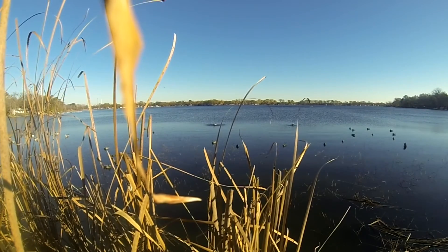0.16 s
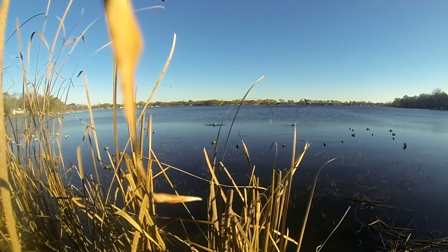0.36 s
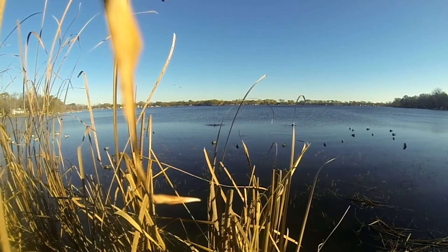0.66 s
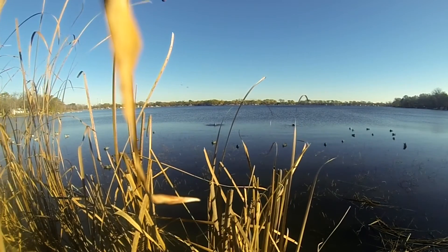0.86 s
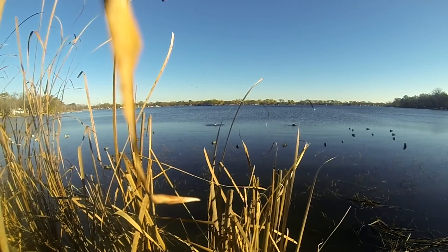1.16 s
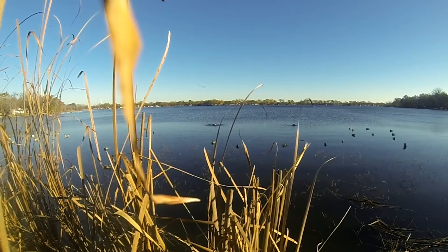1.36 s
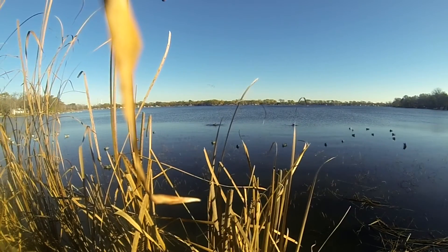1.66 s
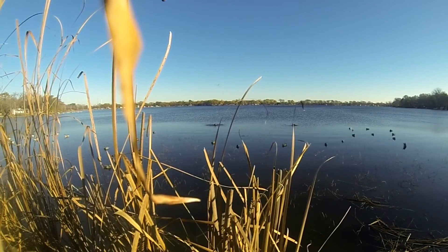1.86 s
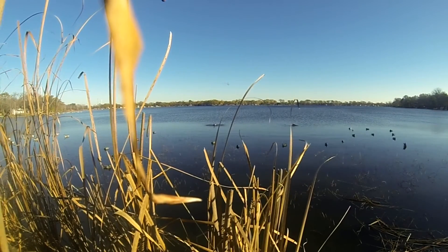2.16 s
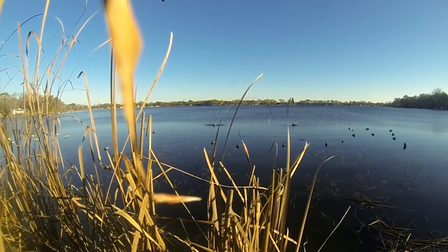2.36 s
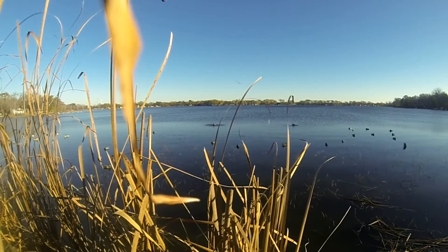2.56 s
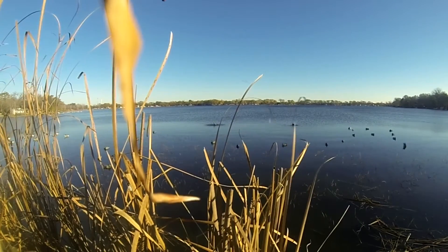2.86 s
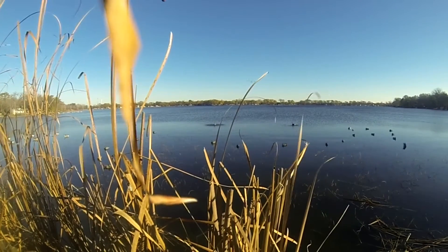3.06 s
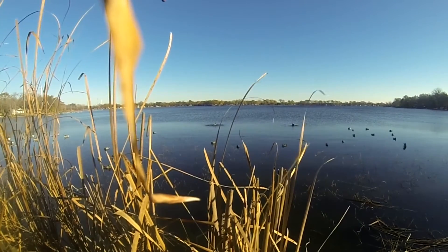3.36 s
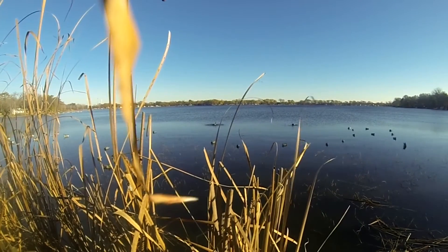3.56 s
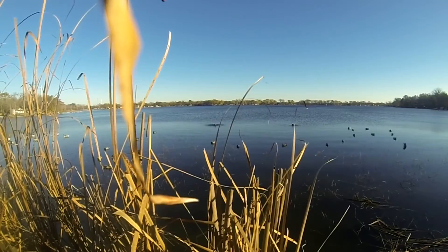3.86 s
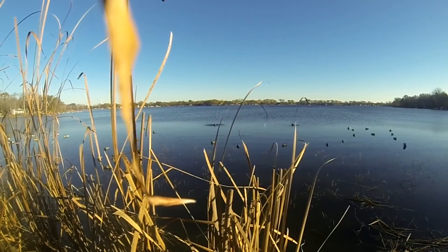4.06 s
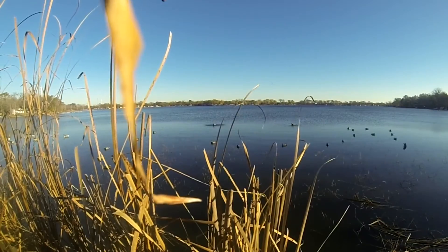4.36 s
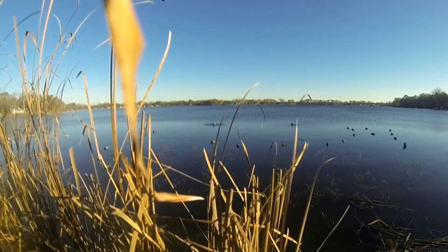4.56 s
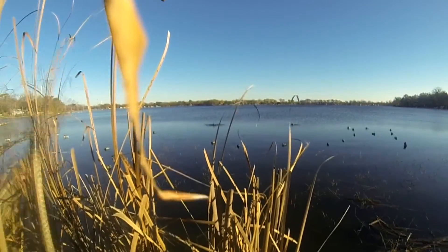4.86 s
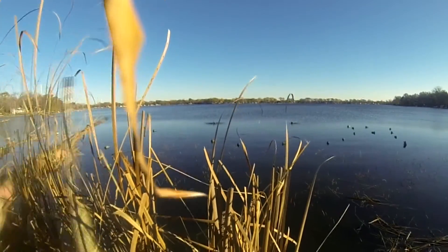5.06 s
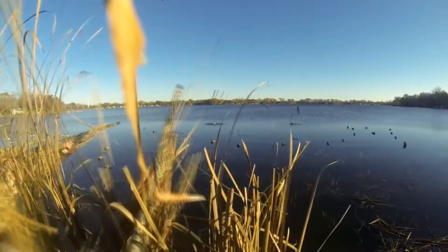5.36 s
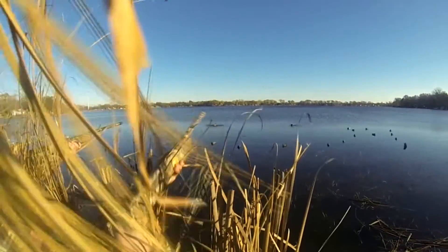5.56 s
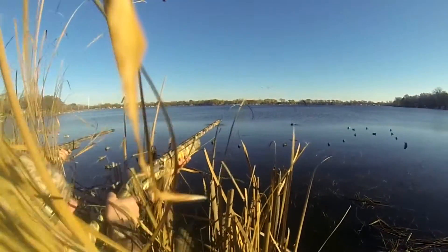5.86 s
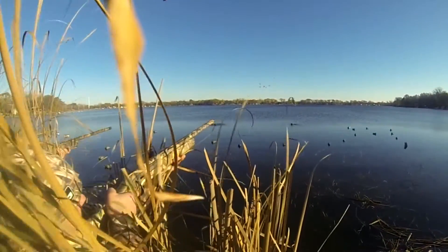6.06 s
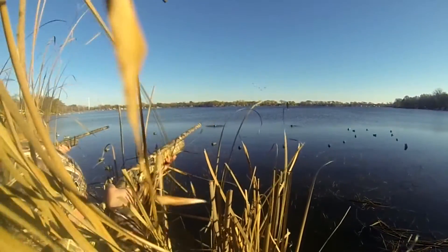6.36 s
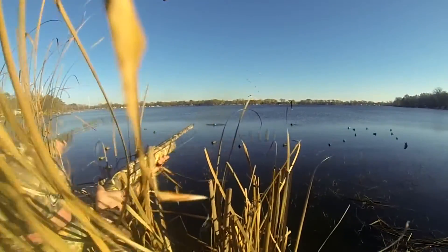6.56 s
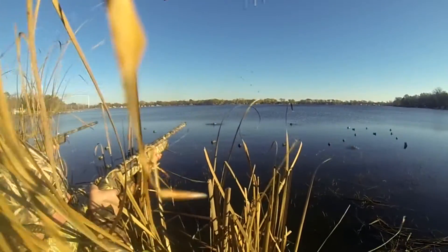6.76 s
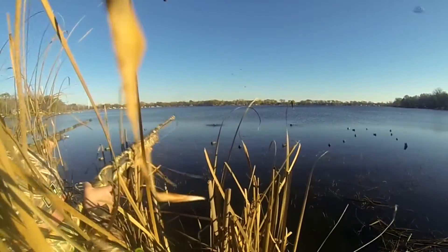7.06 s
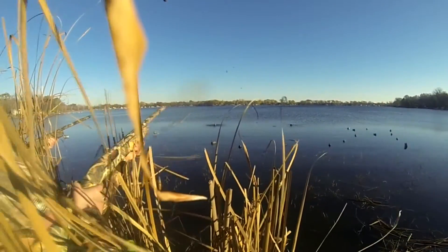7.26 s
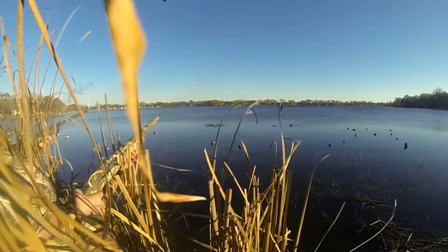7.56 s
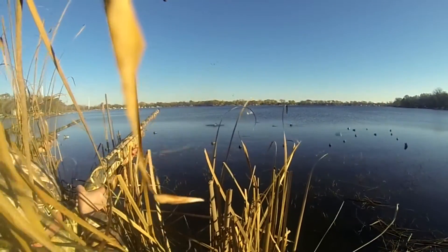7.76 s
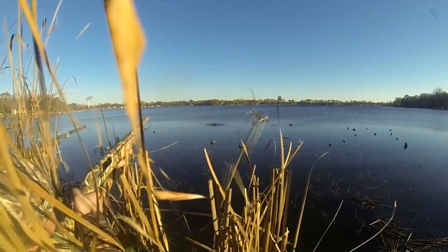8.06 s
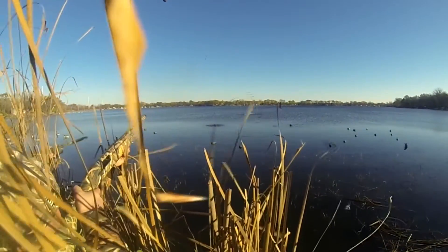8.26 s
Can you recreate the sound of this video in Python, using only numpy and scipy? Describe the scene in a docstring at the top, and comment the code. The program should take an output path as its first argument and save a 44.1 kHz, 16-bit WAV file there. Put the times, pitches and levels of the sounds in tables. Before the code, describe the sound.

From the start to about 3.7 s, a duck call chatters close by, some seven or eight quick notes a second: a bright, nasal, buzzing tick, often followed by a hollow, lower cluck, growing somewhat louder after the first second or so. Behind it are quiet outdoor air, a very faint thin whine and soft low rumbles on the mount. A weak tick and two hollow clucks end the call around 4.0-4.3 s. From 4.4 to 5.5 s hunters rise: hollow board knocks, scrapes, floor thuds, cloth shuffling, crackling stalks, brushing dry leaves and deep pole hum. At 5.6 s shotguns open fire, three blasts by 5.8, four at 6.3-6.5, two near 7.1, two around 7.4 and one at 7.84. Each is brief, harsh and overloaded with a boxy ring; lumpy echoes and low boom roll back between them, fading towards 8.4 s, with small knocks and clicks.

```python
"""A duck call chatters "ticka-ticka" in a reed blind by a lake, beside a camera in a closed housing.
Hunters rise, bump the blind and fire shotguns that overload the microphone; the far shore rolls back.
Pulsed reed noise through mouth resonances makes the call; shots are short bursts of pulses and noise.
Filtered noise makes echoes, leaves, wind rumble and air; decaying sines make the knocks on the boards."""
import sys
import numpy as np
from scipy import signal
from scipy.io import wavfile

SR = 44100
rng = np.random.default_rng(int(sys.argv[2]) if len(sys.argv) > 2 else 0)


def put_to_file(sound):
    """Save the sound as 16-bit audio at rate SR, in the file named by the first command-line argument."""
    columns = np.atleast_2d(sound).T  # one column per channel
    safe = np.clip(columns, -1, 1)
    whole_steps = np.round(safe * 32767)
    wavfile.write(sys.argv[1], SR, whole_steps.astype(np.int16))


N = 371322
TIME_S = np.arange(N) / SR

# Every *_COLOUR: spectrum shape (frequency [Hz], relative level [dB])

# Bright first half of a syllable: (time [s], length [s], level [dB], reed pitch [Hz], attack [s])
TICKS = [(0.056, 0.018, -41, 226, 0.0044), (0.186, 0.031, -35, 258.2, 0.01),
         (0.324, 0.026, -37.5, 255.8, 0.0041), (0.446, 0.028, -36.5, 248.7, 0.0062),
         (0.579, 0.05, -37, 269.5, 0.004), (0.719, 0.04, -40.5, 294.5, 0.0026),
         (0.886, 0.023, -35.5, 241.2, 0.0066), (1.02, 0.025, -35.5, 277, 0.0074),
         (1.157, 0.012, -43, 358, 0.0033), (1.271, 0.027, -34, 339, 0.015),
         (1.407, 0.027, -33.5, 224.8, 0.012), (1.52, 0.042, -37.5, 216.5, 0.0065),
         (1.62, 0.052, -33, 362.2, 0.0024), (1.764, 0.034, -32.5, 324.7, 0.003),
         (1.902, 0.025, -33, 379.4, 0.0077), (2.039, 0.021, -33.5, 275.6, 0.006),
         (2.175, 0.017, -36, 347, 0.0084), (2.318, 0.016, -37, 308.8, 0.004),
         (2.446, 0.033, -31.5, 277.5, 0.004), (2.569, 0.041, -32, 348.5, 0.01),
         (2.71, 0.024, -32.5, 289, 0.01), (2.837, 0.025, -32, 323, 0.015),
         (2.978, 0.033, -32, 266.5, 0.004), (3.122, 0.019, -32, 301.6, 0.0077),
         (3.256, 0.026, -34.5, 253.8, 0.005), (3.398, 0.025, -32, 277.5, 0.0033),
         (3.537, 0.03, -33.5, 292.6, 0.0044), (3.669, 0.033, -33.5, 249, 0.013),
         (3.956, 0.0058, -42, 410.4, 0.0025), (4.392, 0.017, -49.5, 296.4, 0.006)]
TICK_COLOUR = [(150, -37), (500, -18.5), (830, -27.5), (1100, -11), (1550, -3.5), (1850, -2), (2100, -8.5),
               (2580, -3), (2900, -34.5), (3700, -50), (5900, -31), (7300, -49.5), (8500, -45),
               (13000, -79)]
# Tick pitch at start, middle, dying end: (share of reed pitch [ratio])
TICK_PITCH_ARCH = [0.92, 1.1, 0.88]
# Harder blowing is brighter: tilt at the usual level, and its rise per dB above
USUAL_TICK_DB, USUAL_BRIGHT_DB, BRIGHT_PER_DB = -34.5, -3, 0.74

# Hollow second half, tongue dropped: (time [s], length [s], level [dB])
CLUCKS = [(0.191, 0.039, -45.5), (0.338, 0.027, -44), (0.463, 0.035, -37.5), (0.584, 0.057, -43.5),
          (0.735, 0.038, -48.5), (1.404, 0.042, -43.5), (1.519, 0.044, -45.5), (1.643, 0.046, -50.5),
          (1.786, 0.031, -42.5), (1.909, 0.037, -40), (2.041, 0.035, -36.5), (2.368, 0.031, -40.5),
          (2.487, 0.037, -43), (2.603, 0.05, -42), (2.747, 0.035, -37), (2.878, 0.042, -37),
          (3.011, 0.048, -40), (3.161, 0.042, -35.5), (3.257, 0.02, -42), (3.418, 0.048, -36.5),
          (3.567, 0.03, -38), (3.704, 0.036, -38.5), (4.141, 0.032, -35.5), (4.266, 0.033, -34.5)]
CLUCK_COLOUR = [(150, -21), (300, -32), (400, -13), (620, -25.5), (740, -21), (900, -38.5), (1180, -7.5),
                (1400, -6), (1650, -20.5), (2200, -22.5), (2550, -19), (2850, -52), (5000, -56.5)]
# Mouth resonance sliding up: (start [Hz], end [Hz], width [Hz], level over direct sound [dB])
MOUTH = (1332, 1470, 70, 4.9)
# A harder cluck loses its low body
USUAL_CLUCK_DB, CLUCK_TILT_PER_DB = -38, 0.5
RASP_COLOUR = [(2000, -18), (3400, -11), (3900, 3.5), (4400, -9.5), (4950, 5), (5400, -50), (6200, -5.5),
               (7000, -36), (8500, -27), (14000, -49.5)]
RASP_DB = -62  # the same in every cluck
TONGUE_SPREAD, MOUTH_SPREAD = 0.015, 0.024  # resonance spread between notes [share]

# Ringing of the camera housing: (frequency [Hz], width [Hz], level over direct sound [dB])
HOUSING = [(1402, 40.6, 1), (373, 22, -3.5), (740.5, 8.9, 2.5)]

# Shots; echo depends on the aim:
# (time [s], level [dB], blast length [ms], brightness tilt [dB], echo level [dB])
SHOTS = [(5.6027, -7, 4.1, 0, -47.5), (5.651, -17.5, 2.2, -5, -64), (5.7805, -11.5, 2.8, -5, -45),
         (6.306, -10.5, 3.9, 0, -64), (6.3643, -15, 0.72, 0.5, -60), (6.4011, -17.5, 3.7, 6.5, -62),
         (6.4999, -11.5, 2.4, 3.5, -44), (7.097, -5.5, 2.1, -6, -44.5), (7.1568, -18.5, 5.6, 6.5, -56),
         (7.3588, -10, 3.8, -8, -65.5), (7.4461, -14, 4.2, 4, -46.5), (7.8415, -11, 5.7, 9, -45)]
BLAST_COLOUR = [(40, -10.5), (150, -7.5), (600, -11.5), (880, -16), (1250, 0.5), (1700, -6), (2550, -2.5),
                (2900, -11.5), (3800, -12), (5300, -24.5), (6700, -17.5), (8500, -34.5), (13500, -38)]
TAIL_COLOUR = [(120, -4), (230, -3), (400, 3), (600, 6), (880, -9), (1300, 3), (1700, 0.5), (2500, -11),
               (3200, -10.5), (5300, -20), (6700, -21), (8500, -31), (10000, -24), (14000, -45)]
TAIL_SHARE = 0.37  # dB of scatter and boom per dB of blast

# Stretches of shore returning every shot: (delay [s], length [s], level against the shot's echo [dB])
SHORES = [(0.04, 0.24, -7.5), (0.215, 0.15, -3), (0.38, 0.28, -9.5)]
ROLL_COLOUR = [(200, -15), (290, -7.5), (400, 7), (500, 2.5), (600, -4), (740, 0.5), (900, -8), (1160, 5),
               (1370, 7), (1500, -4.5), (1700, -2), (2550, -9.5), (5000, -29), (8000, -43), (15000, -67.5)]
SHORE_RISE_S, SHORE_FALL_S = 0.032, 0.06
# Boom over the water after every shot; its colour also serves the blind's floor
BOOM_COLOUR = [(40, -31), (80, -4), (110, 17), (132, 21), (160, 11), (200, -10), (300, -26.5)]
BOOM_DB, BOOM_RISE_S, BOOM_HOLD_S, BOOM_FALL_S = -36.5, 0.008, 0.32, 0.17

# Bumps on the blind: (time [s], ring level [dB], pitch [Hz], scrape level [dB])
KNOCKS = [(4.406, -41, 370, -71), (4.534, -35, 415, -51.5), (4.575, -41.5, 537, -40.5),
          (4.587, -36.5, 358, -68), (4.641, -25, 360, -44.5), (4.795, -39, 447, -39.5),
          (4.974, -35.5, 410, -52.5), (5.013, -48, 356, -50.5), (5.091, -59, 357, -41),
          (5.122, -29, 532, -52), (5.305, -48.5, 375, -47.5), (5.48, -26.5, 514, -50),
          (7.044, -34.5, 380, -41), (7.772, -38.5, 422, -36)]
# Board modes: (multiple of lowest pitch [ratio], level [dB])
BOARD_MODES = [(1, 2.5), (1.268, -6.5), (1.6, -15.5)]
SCRAPE_COLOUR = [(200, 2), (550, 0), (850, 0), (1150, 4.5), (1600, 2.5), (2100, -7.5), (3000, -21),
                 (6000, -34), (12000, -51)]
# Sharp clicks of stalks and gear: (time [s], level [dB])
SNAPS = [(3.96, -58), (4.148, -55), (4.447, -58.5), (5.573, -60), (5.729, -50.5), (5.894, -58),
         (6.218, -65), (6.596, -53.5), (7.247, -49.5), (7.771, -50.5)]
SNAP_COLOUR = [(800, -43), (2500, -4), (5000, -9.5), (6600, -9), (8000, -20), (10000, -20), (15000, -35.5)]
# Thuds through the floor: (time [s], level [dB], length [s])
THUDS = [(0.9, -53, 0.055), (2.435, -43, 0.039), (3.5, -53, 0.17), (4.3, -43.5, 0.029), (4.45, -31, 0.032),
         (4.577, -32.5, 0.0058), (4.8, -26.5, 0.035), (5.15, -35, 0.074), (7.765, -33, 0.017)]

# Hunters getting up: (time [s], shuffling level [dB])
MOVING = [(4.25, -66), (4.35, -60), (4.5, -46.5), (4.67, -55), (4.8, -48.5), (5.2, -46.5), (5.59, -45)]
SHUFFLE_COLOUR = [(200, -5.5), (310, -11), (360, 8.5), (500, 6.5), (630, -9), (730, 1), (860, -15.5),
                  (1150, -11), (1400, -8.5), (1800, -16.5), (2300, -26), (3500, -42)]
CRACKLE_COLOUR = [(600, -2), (1800, -1), (5000, -8), (8000, -15.5), (13000, -29)]
CRACKLE_DB, CREAK_DB, CRACKS_PER_S = -19, 2.5, 260  # stalks and floor, levels against the shuffling
# Dry leaves brushing past: (time [s], length [s], level [dB])
SWISH = [(4.45, 0.28, -81), (4.74, 0.097, -62.5), (4.98, 0.1, -66.5), (5.18, 0.3, -62)]
SWISH_COLOUR = [(1500, -10.5), (2500, -1.5), (3800, -3.5), (4950, -1.5), (5500, -11), (7000, -8),
                (9000, -20), (9900, -8.5), (12000, -17), (14000, -19), (15300, -39)]
SWISH_RISE_S, SWISH_FALL_S, SWISH_GRAIN_DB = 0.055, 0.076, 3  # grain: leaves catch and slip

# Weight shifts shaking blind and camera pole: (time [s], length [s], level [dB])
SHIFTS = [(0.0, 0.26, -55.5), (0.88, 0.27, -47.5), (1.12, 0.22, -43.5), (1.98, 0.3, -43), (2.42, 0.23, -40),
          (2.8, 0.42, -45), (3.38, 0.91, -46.5), (4.38, 0.36, -32), (4.78, 0.21, -27), (5.3, 0.13, -25),
          (5.9, 0.39, -36.5), (6.7, 0.2, -40), (7.15, 0.5, -52), (7.8, 0.32, -38)]
SHIFT_RISE_S, SHIFT_FALL_S = 0.07, 0.18
POLE_HZ, POLE_WOBBLE, POLE_FLUTTER_DB = 47, 0.061, 3  # wobble [share of pitch]
# Low rumble on the camera mount: (time [s], level [dB])
MOUNT = [(0, -68), (0.7, -64.5), (1.25, -51.5), (1.65, -65.5), (2.45, -52), (3.3, -61), (4.05, -59.5),
         (4.52, -30.5), (5.5, -34), (5.9, -45), (7.0, -44), (7.9, -40), (8.42, -46)]
RUMBLE_COLOUR = [(15, -2.5), (25, 5.5), (40, -9.5), (60, -9), (72, 9), (100, -18), (130, -7), (180, -18),
                 (400, -38.5)]
AIR_COLOUR = [(40, 0), (75, -8), (130, 5), (200, -12.5), (450, -8.5), (620, -19.5), (1400, -24),
              (2200, -24.5), (3000, -30), (6700, -38.5), (8500, -39), (10000, -37.5), (12000, -45.5),
              (16000, -51)]
AIR_DB = -60
# Faint camera whine: (frequency [Hz], width [Hz], level [dB])
WHINE = (7400, 520, -85.5)

CEILING = 0.36  # microphone overload, full scale = 1
BAND_EDGE_HZ = 15600


def amp(db):
    """Converts decibels to a linear gain."""
    return 10 ** (np.asarray(db) / 20)


def unit(x):
    """Scales to an rms of one."""
    return x / np.sqrt(np.mean(x ** 2) + 1e-20)


def at_level(x, length_s, db):
    """Scales so that the first length_s has the given rms."""
    head = x[:max(int(length_s * SR), 200)]
    return x * amp(db) / np.sqrt(np.mean(head ** 2) + 1e-20)


def add(mix, start_s, sound):
    """Lays a sound into the mix at a time."""
    part = mix[max(round(start_s * SR), 0):][:len(sound)]
    part += sound[:len(part)]


def colour(x, points, size=8192):
    """Causal minimum-phase filter of unit energy with the given spectrum, falling above its last point."""
    hz, db = np.transpose(points)
    grid_hz = abs(np.fft.fftfreq(size, 1 / SR)) + 1
    db = np.interp(np.log(grid_hz), np.log(hz), db)
    db = db - 24 * np.clip(np.log2(grid_hz / hz[-1]), 0, 3)  # 24 dB per octave, for three octaves
    spectrum = np.exp(np.conj(signal.hilbert(np.log(amp(db)))))
    taps = np.fft.ifft(spectrum).real[:size // 2]
    taps = taps * np.hanning(size)[size // 2:]
    return signal.fftconvolve(x, taps / np.linalg.norm(taps))[:len(x)]


def tilted(points, db, hz=1800, octaves=0.93):
    """Raises the part of a spectrum above hz against the part below."""
    return [(f, d + db * np.clip(np.log2(f / hz) / octaves, -.5, .5)) for f, d in points]


def resonate(x, hz, width_hz):
    """One resonance, steady or sliding, with a gain of one at its centre."""
    turn = np.exp(2j * np.pi * np.cumsum(hz * np.ones(len(x))) / SR)
    r = np.exp(-np.pi * width_hz / SR)
    return 2 * (turn * signal.lfilter([1 - r], [1, -r], x / turn)).real


def housed(x):
    """The camera housing rings along with what reaches it."""
    return x + sum(amp(db) * resonate(x, hz, width_hz) for hz, width_hz, db in HOUSING)


def scatter(x, t60_s, wet_db, count=9000):
    """Sparse decaying reflections from the stalks and the blind."""
    t = np.arange(count) / SR
    taps = rng.standard_normal(count) * (rng.random(count) < .04)
    taps = taps * amp(-60 * t / t60_s) * (t > .003)
    return x + amp(wet_db) * signal.fftconvolve(x, taps / np.linalg.norm(taps))[:len(x)]


def waver(count, hz):
    """Straight lines between random values drawn hz times a second."""
    return np.interp(np.arange(count) / SR * hz, np.arange(4096), rng.standard_normal(4096))


def noise(points, flutter_db=0, flutter_hz=30):
    """Coloured noise of unit rms whose level flutters."""
    return unit(colour(rng.standard_normal(N) * amp(flutter_db * waver(N, flutter_hz)), points))


def level(table):
    """Gain curve through (time [s], level [dB]) rows, fading quickly outside them."""
    time_s, db = np.transpose(table)
    outside_s = abs(TIME_S - np.clip(TIME_S, time_s[0], time_s[-1]))
    return amp(np.interp(TIME_S, time_s, db)) * np.exp(-outside_s / 0.019)


def gate(t, length_s, rise_s, fall_s):
    """Swells exponentially, holds until length_s, and dies away."""
    return (1 - np.exp(-t / rise_s)) * np.exp(-np.maximum(t - length_s, 0) / fall_s)


def swells(rows, rise_s, fall_s):
    """Gain curve of overlapping (time [s], length [s], level [dB]) swells whose powers add."""
    gains = (amp(db) * gate(np.maximum(TIME_S - s, 0), length_s, rise_s, fall_s)
             for s, length_s, db in rows)
    return np.sqrt(sum(gain ** 2 for gain in gains))


def reed(t, hz, jitter, uneven_db, air):
    """The reed slaps shut at uneven intervals, with a little air rushing past."""
    turns = np.cumsum(hz * np.exp(jitter * waver(len(t), 300))) / SR
    slaps = np.diff(np.floor(turns), prepend=-1)
    slaps = slaps * amp(uneven_db * rng.standard_normal(len(t)))
    return unit(slaps) + air * rng.standard_normal(len(t))


def ticks():
    """A fast reed rattle excites a resonance that falls as the tongue leaves the palate."""
    out, t = np.zeros(N), np.arange(SR // 6) / SR
    for s, length_s, db, pitch_hz, attack_s in TICKS:
        bright_db = USUAL_BRIGHT_DB + BRIGHT_PER_DB * (db - USUAL_TICK_DB)
        hz = pitch_hz * np.interp(t, [0, length_s * .5, length_s * 1.5], TICK_PITCH_ARCH)
        drive = reed(t, hz, jitter=.11, uneven_db=1.5, air=.25)
        drive = drive * gate(t, length_s, rise_s=attack_s, fall_s=0.005)
        tongue_hz = np.interp(t, [0, length_s * 3.0], [1985, 1685]) + 30 * bright_db
        tongue_hz = tongue_hz * (1 + TONGUE_SPREAD * rng.standard_normal())
        drive = drive + resonate(drive, tongue_hz, 350)
        tick = housed(colour(drive, tilted(TICK_COLOUR, bright_db)))
        add(out, s, at_level(scatter(tick, t60_s=0.082, wet_db=-3.0), length_s, db))
    return out


def clucks():
    """A slower reed rattle in a hollower mouth whose resonance slides up, with a rasp on top."""
    out, t = np.zeros(N), np.arange(SR // 6) / SR
    low_hz, high_hz, width_hz, mouth_db = MOUTH
    for s, length_s, db in CLUCKS:
        hz = np.interp(t, [0, length_s * 1.1], [185, 145])
        drive = reed(t, hz, jitter=.16, uneven_db=2, air=.25)
        drive = drive * gate(t, length_s, rise_s=0.0059, fall_s=0.0079)
        tilt_db = CLUCK_TILT_PER_DB * (db - USUAL_CLUCK_DB)
        cluck = colour(drive, tilted(CLUCK_COLOUR, tilt_db, hz=900, octaves=0.6))
        mouth_hz = np.interp(t, [0, length_s * 0.97], [low_hz, high_hz])
        mouth_hz = mouth_hz * (1 + MOUTH_SPREAD * rng.standard_normal())
        cluck = cluck + amp(mouth_db) * resonate(cluck, mouth_hz, width_hz)
        add(out, s, at_level(scatter(housed(cluck), t60_s=0.08, wet_db=-1.5), length_s, db))
        rasp = scatter(colour(drive, RASP_COLOUR), t60_s=0.014, wet_db=-3.0)
        add(out, s, at_level(rasp, length_s, RASP_DB))
    return out


def shots():
    """A few milliseconds of blast, then its scatter from the reeds and the water."""
    out, t = np.zeros(N), np.arange(SR // 3) / SR
    for s, db, length_ms, bright_db, _ in SHOTS:
        length_s = length_ms / 1000
        # pressure fronts off the nearest stalks, irregular, about 3000 per second
        fronts = np.diff(np.floor(np.cumsum(rng.exponential(1, len(t))) * 3000 / SR), prepend=-1)
        blast = fronts * rng.choice([-1, 1], len(t)) + 0.24 * rng.standard_normal(len(t))
        blast = blast * gate(t, length_s, rise_s=0.0028, fall_s=0.0019)
        blast = blast + amp(-8.5) * resonate(blast, 1350, 310)  # kicks the housing wall
        blast = housed(colour(blast, tilted(BLAST_COLOUR, bright_db)))
        add(out, s, at_level(blast, length_s, db))
        near = amp(-17.0) * gate(t, length_s, rise_s=0.0016, fall_s=0.0086)
        far = amp(-28.5) * gate(t, length_s, rise_s=0.0056, fall_s=0.038)
        tail = unit(housed(colour(rng.standard_normal(len(t)), TAIL_COLOUR)))
        add(out, s, amp(TAIL_SHARE * db) * (near + far) * tail)
    return out


def shore_echo():
    """Each stretch of shore returns each shot as a lumpy roll, dull and bright parts apart, over a boom."""
    returns = [(s + delay_s, length_s, echo_db + shore_db)
               for s, *_, echo_db in SHOTS for delay_s, length_s, shore_db in SHORES]
    booms = [(s, BOOM_HOLD_S, BOOM_DB + TAIL_SHARE * db) for s, db, *_ in SHOTS]
    dull_colour = tilted(ROLL_COLOUR, -10.0, hz=1000, octaves=1)
    bright_colour = tilted(ROLL_COLOUR, 8.5, hz=900, octaves=0.84)
    dull = noise(dull_colour, flutter_db=3.5, flutter_hz=24.97)
    bright = noise(bright_colour, flutter_db=1.5, flutter_hz=31.8)
    roll = swells(returns, SHORE_RISE_S, SHORE_FALL_S) * (amp(-1.5) * dull + bright)
    return roll + swells(booms, BOOM_RISE_S, BOOM_FALL_S) * noise(BOOM_COLOUR)


def knocks():
    """Bumped boards ring in a few short modes, each with a noise scrape."""
    out, t = np.zeros(N), np.arange(SR // 5) / SR
    for s, db, hz, scrape_db in KNOCKS:
        modes = sum(amp(mode_db) * np.sin(2 * np.pi * hz * ratio * t) for ratio, mode_db in BOARD_MODES)
        ring = modes * gate(t, .002, rise_s=.002, fall_s=.005)
        add(out, s, at_level(scatter(ring, t60_s=0.1, wet_db=-3), 0.01, db))
        push = rng.standard_normal(len(t)) * gate(t, .004, rise_s=0.0025, fall_s=0.0073)
        scrape = scatter(colour(push, SCRAPE_COLOUR), t60_s=0.08, wet_db=-1.5)
        add(out, s, at_level(scrape, 0.022, scrape_db))
    return out


def snaps():
    """Stalks and gear click: short bright noise bursts."""
    out, t = np.zeros(N), np.arange(SR // 5) / SR
    for s, db in SNAPS:
        crack = rng.standard_normal(len(t)) * gate(t, .002, rise_s=0.001, fall_s=0.0097)
        add(out, s, at_level(colour(crack, SNAP_COLOUR), 0.011, db))
    return out


def thuds():
    """Weight lands on the floor, which booms for a moment."""
    out, t = np.zeros(N), np.arange(SR // 3) / SR
    for s, db, length_s in THUDS:
        push = rng.standard_normal(len(t)) * gate(t, length_s, rise_s=0.0013, fall_s=0.017)
        add(out, s, at_level(colour(push, BOOM_COLOUR), length_s + 0.051, db))
    return out


def moving():
    """Clothes shuffle, the floor rumbles and dry stalks crackle as random impulses."""
    cracks = (rng.random(N) < CRACKS_PER_S / SR) * rng.standard_normal(N) * amp(3.7 * waver(N, 15))
    crackle = amp(CRACKLE_DB) * unit(colour(cracks, CRACKLE_COLOUR))
    shuffle = noise(SHUFFLE_COLOUR, flutter_db=2.0, flutter_hz=50.5)
    floor = amp(CREAK_DB) * noise(BOOM_COLOUR)
    return level(MOVING) * (shuffle + crackle + floor)


def leaves():
    """Dry leaves brush past: swelling bright noise with a fast grain."""
    swish = noise(SWISH_COLOUR, flutter_db=SWISH_GRAIN_DB, flutter_hz=410)
    return swells(SWISH, SWISH_RISE_S, SWISH_FALL_S) * swish


def pole_hum():
    """The shaken camera pole hums at its own pitch, wandering in pitch and level."""
    hz = POLE_HZ * (1 + POLE_WOBBLE * waver(N, 12))
    hum = np.sin(2 * np.pi * np.cumsum(hz) / SR) * amp(POLE_FLUTTER_DB * waver(N, 12))
    return swells(SHIFTS, SHIFT_RISE_S, SHIFT_FALL_S) * unit(hum)


def outdoors():
    """Low wind rumble on the mount, steady air noise and a thin whine of narrow-band noise."""
    rumble = level(MOUNT) * noise(RUMBLE_COLOUR)
    hz, width_hz, db = WHINE
    whine = resonate(resonate(rng.standard_normal(N), hz, width_hz), hz, width_hz)
    return rumble + amp(AIR_DB) * noise(AIR_COLOUR) + amp(db) * unit(whine)


def scene():
    """Sums all sources into one channel."""
    call = ticks() + clucks()
    gunfire = shots() + shore_echo()
    blind = knocks() + snaps() + thuds() + moving() + leaves()
    return (call + gunfire + blind + pole_hum() + outdoors())[None]


def record(dry):
    """The microphone saturates smoothly towards its ceiling; then the band limit."""
    clipped = dry / (1 + (dry / CEILING) ** 4) ** (1 / 4)
    lowpass = signal.firwin(255, BAND_EDGE_HZ, window=("kaiser", 9), fs=SR)
    return signal.oaconvolve(clipped, lowpass[None], "same")


dry = scene()
out = record(dry)
put_to_file(out)
```